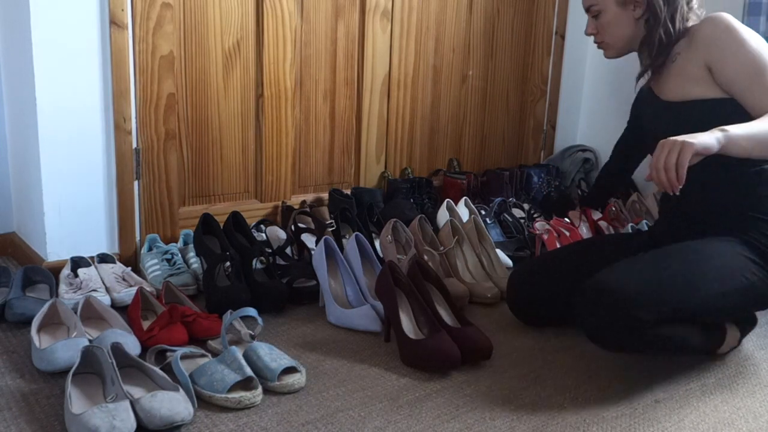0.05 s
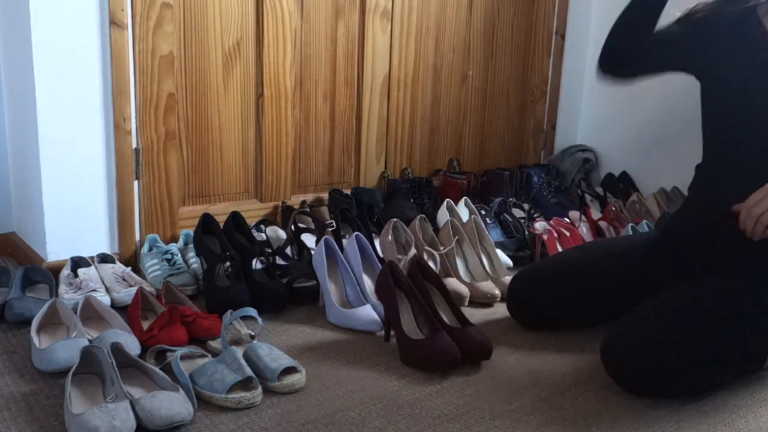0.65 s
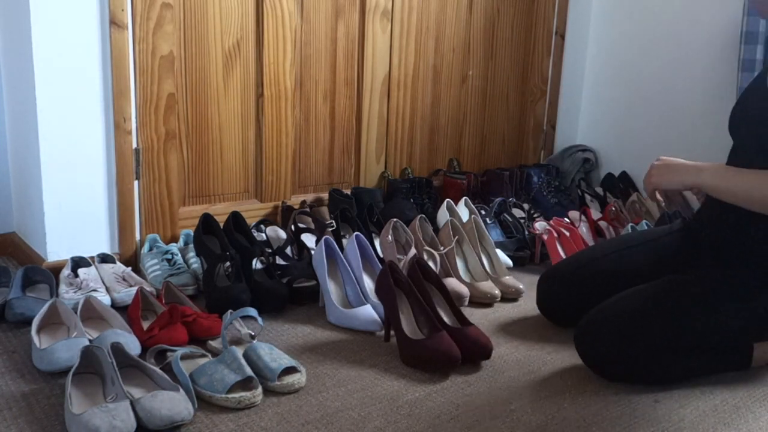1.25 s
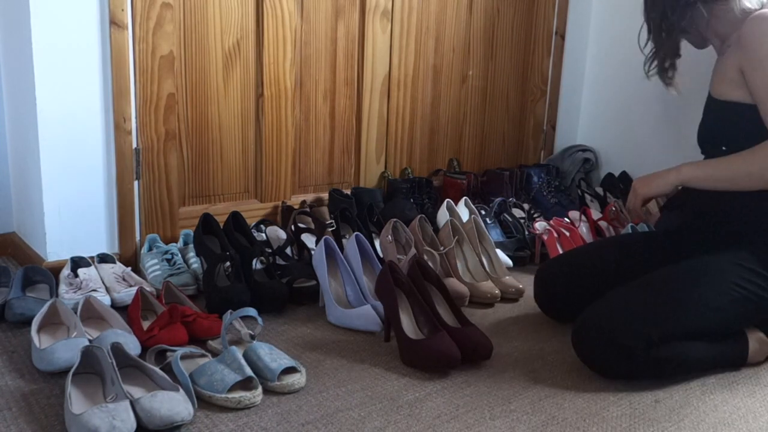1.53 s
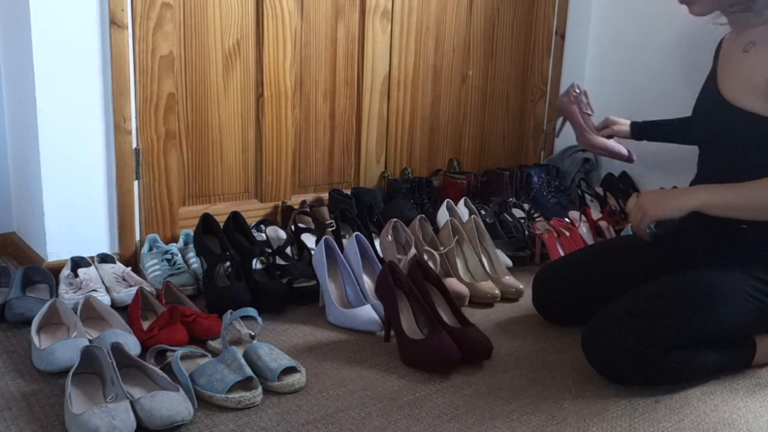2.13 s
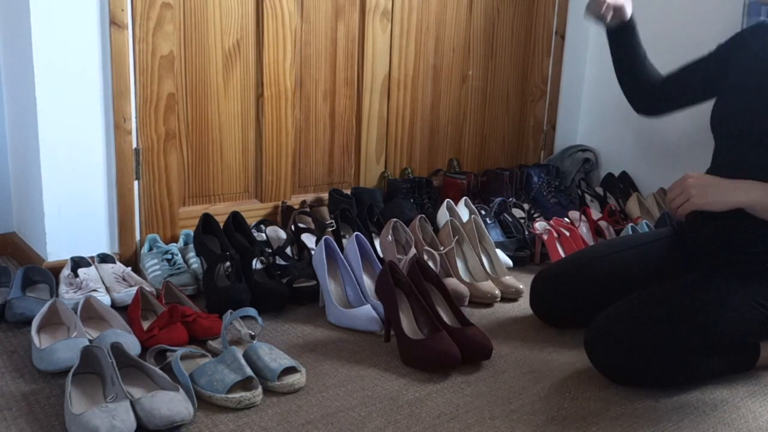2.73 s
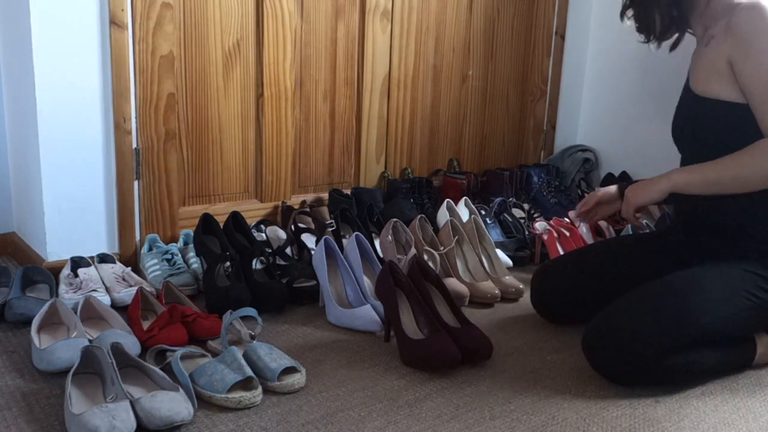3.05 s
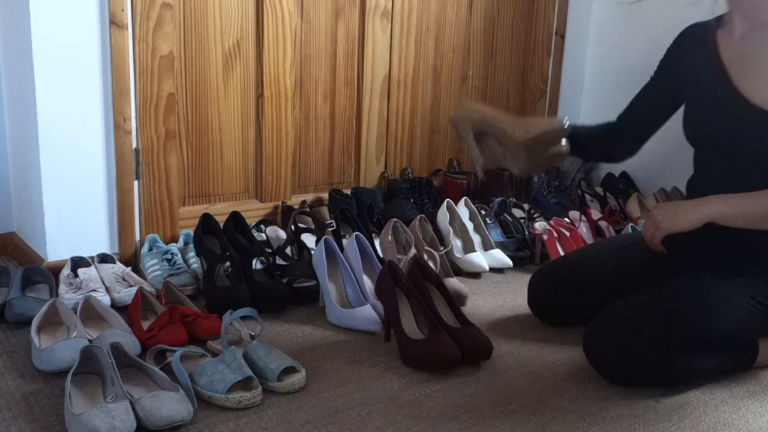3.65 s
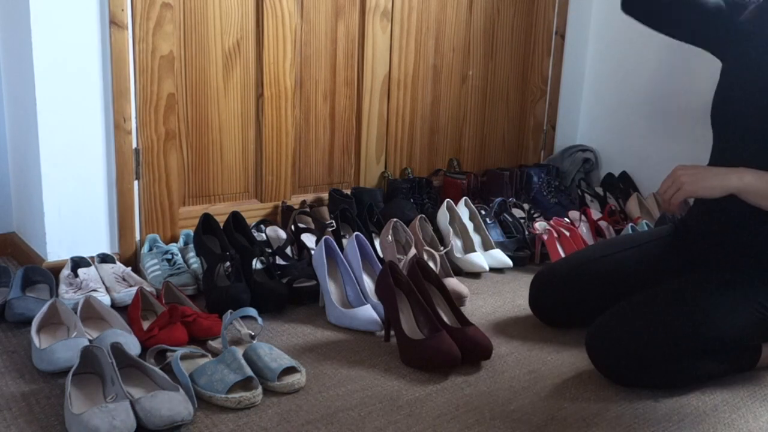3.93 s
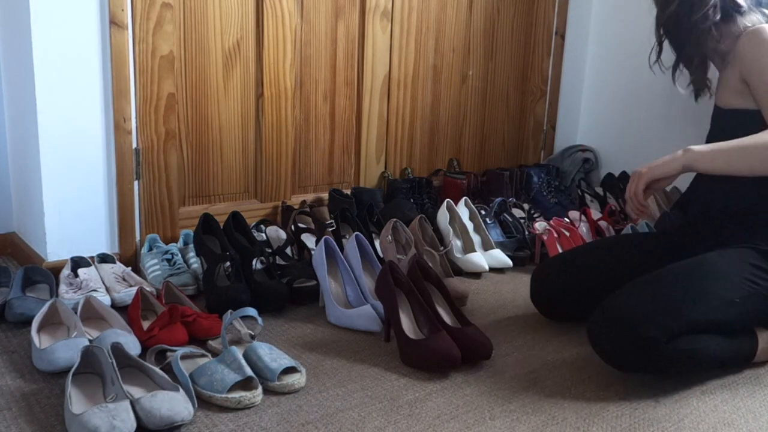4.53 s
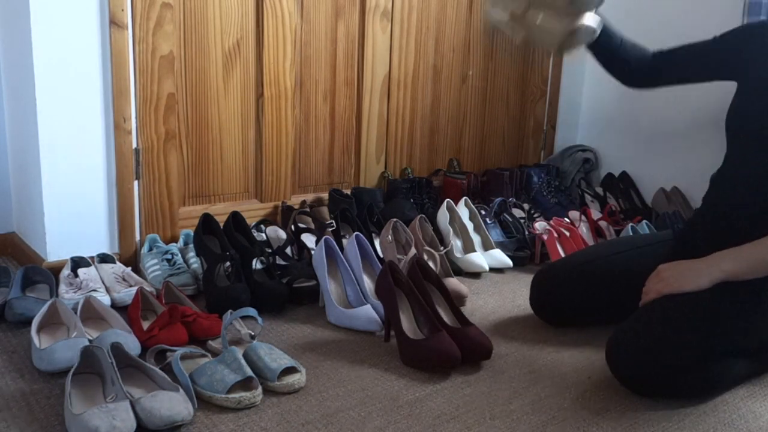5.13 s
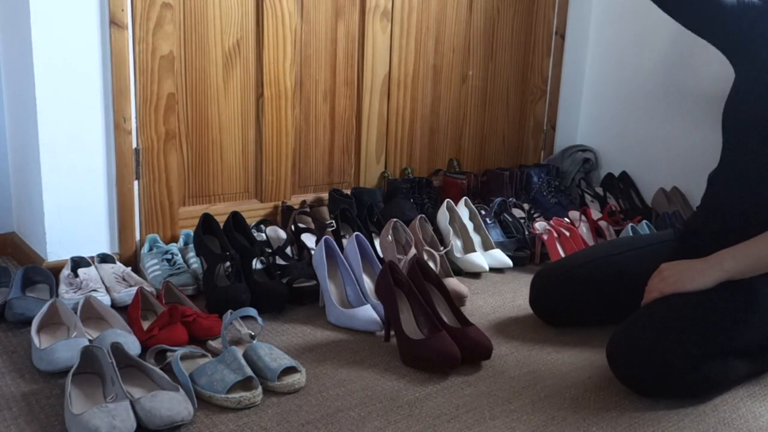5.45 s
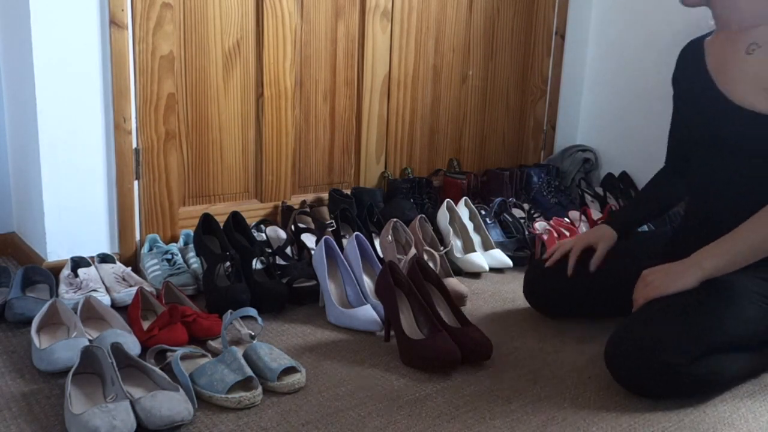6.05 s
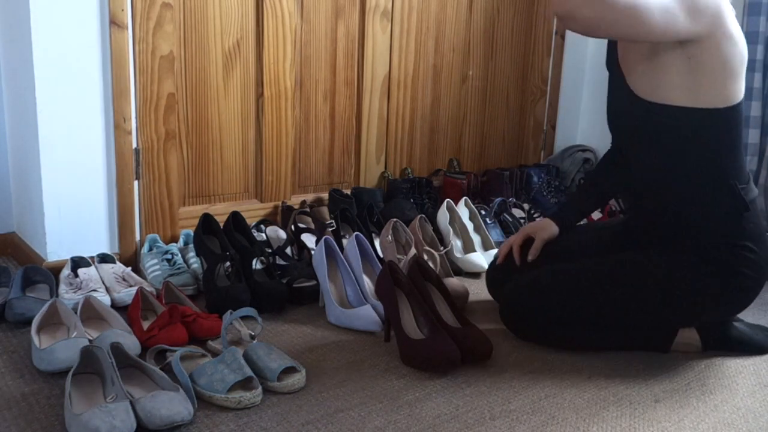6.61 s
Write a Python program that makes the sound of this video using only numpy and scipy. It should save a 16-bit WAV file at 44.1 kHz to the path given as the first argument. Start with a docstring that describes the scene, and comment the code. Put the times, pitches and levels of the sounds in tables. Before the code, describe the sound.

High-heeled shoes are picked up and tossed aside in a small room with little echo, over faint steady hum and hiss. At first, clothes rustle with a soft bump on carpet. Leather creaks briefly, and at about 0.9 seconds a pair lands in a hollow clatter of heels and soles, then skids and settles. Quiet fabric movement and leather rubbing lead to a second clatter at 2.7 seconds. More creaks of shoes gripped in the hand run from 3.2 to 3.9 seconds, followed by a brighter clatter at 4.1 with small bounces and a short slide. After a dull bump near 4.9 and further creaks, a fourth pair lands at 5.5 seconds, with one sharp click at 5.85. From 6 seconds to nearly 7, clothes brush and swish as the person shifts, with a muffled bump on the carpet around 6.4.

```python
"""High heels tossed on carpet

Someone kneeling in a small, dead room picks up pairs of shoes and tosses them aside.
Each pair lands in a clatter of heels and soles, then skids. Leather sticks and slips in the hand,
knees bump the floor, clothes brush the pile. Faint hum and hiss underneath."""
import sys
import numpy as np
from scipy import signal
from scipy.fft import rfft, irfft
from scipy.io import wavfile
from scipy.ndimage import uniform_filter1d, map_coordinates

SR = 44100
rng = np.random.default_rng(int(sys.argv[2]) if len(sys.argv) > 2 else 0)


def master_out(mix):
    """Clip the mix to full scale and print it as 16-bit PCM to the path in sys.argv[1]."""
    frames = np.transpose(np.atleast_2d(mix))
    ceiling = np.clip(frames, -1, 1)
    pcm = np.round(ceiling * 32767).astype(np.int16)
    wavfile.write(sys.argv[1], SR, pcm)


N = 298998
FFT_SIZE = 2 ** 15
HZ = np.maximum(np.fft.rfftfreq(FFT_SIZE, 1 / SR), 1)
AGE_S = np.arange(FFT_SIZE // 2) / SR
TIME_S = np.arange(N) / SR

# room decay: (frequency [Hz], T60 [s])
ROOM_DECAY = [(100, 0.32), (300, 0.13), (800, 0.15), (2000, 0.1), (5000, 0.1), (13000, 0.099)]
# stereo width; the microphone ports differ more for short waves: (frequency [Hz], side minus mid [dB])
DIFFUSE_WIDTH = [(30, -11.5), (70, -30), (130, -48), (300, -68), (600, -28.5), (1200, -13), (2500, -9.5),
                 (5000, -8), (9000, -4), (13000, -3)]
# room air and microphone hiss: (frequency [Hz], gain [dB])
AIR_SPECTRUM = [(15, -67), (25, -30), (145, -13.5), (175, -10.5), (200, -7.5), (249, -11.5), (344, -11),
                (394, -15), (451, -13), (1440, -23.5), (1790, -25.5), (2280, -23.5), (5140, -27),
                (13600, -27), (16000, -28.5)]
# width of the hiss, each port's own: (frequency [Hz], side minus mid [dB])
HISS_WIDTH = [(30, -14), (150, -17.5), (380, -7), (700, -1.5), (1300, 2), (16000, 0.5)]
# steady hum: (frequency [Hz], rms level [dB])
HUM_TONES = [(200.0, -70), (230.0, -86), (299.9, -83), (400.0, -86)]
# brushing on carpet: (frequency [Hz], gain [dB])
BRUSH_SPECTRUM = [(40, -25), (110, -8), (300, -3), (700, -1.5), (1300, -9), (3000, -15), (8000, -49)]
# fabric hiss: (frequency [Hz], gain [dB])
FABRIC_SPECTRUM = [(500, -32), (1300, -2.5), (2100, -3), (4000, 2.5), (8000, -0.5), (13000, -4.5),
                   (16000, -6)]
# clothes moving as the body shifts: (start [s], length [s], relative brush [dB], hiss [dB])
CLOTH_STROKES = [(-.04, 0.25, -64, -62.5), (0.16, 0.28, -58.5, -60.5), (1.166, 0.17, -60.5, -60.5),
                 (1.788, 0.095, -60, -66), (1.857, 0.18, -63, -67.5), (2.23, 0.31, -80, -71.5),
                 (3.227, 0.22, -71.5, -68.5), (3.392, 0.19, -70, -67.5), (4.63, 0.17, -61.5, -67),
                 (4.725, 0.13, -64.5, -68), (5.64, 0.23, -64.5, -62.5), (6.021, 0.26, -62.5, -61.5),
                 (6.212, 0.21, -62.5, -57), (6.324, 0.097, -54.5, -54), (6.372, 0.26, -65, -67),
                 (6.528, 0.33, -57, -58.5)]
# knees, hands and shoes on carpet: (time [s], level [dB], pitch [Hz], resonance [dB], slip time [s])
FLOOR_BUMPS = [(0.19, -6.5, 392, 9, .0013), (0.211, -7.5, 605, -4, 0.015), (1.109, -10.5, 170, 14, .005),
               (1.168, -15, 187, 13, .0024), (1.806, -26.5, 625, 19, 0.0028),
               (2.680, -0.5, 164, 15, 0.0043), (2.697, -4.5, 110, 13, 0.0032),
               (4.899, -6.5, 128, 8, 0.00091), (6.368, 1.5, 141, -3, 0.011), (6.387, -1, 470, 6, 0.024)]
# rubbed leather: (frequency [Hz], gain [dB])
LEATHER_SPECTRUM = [(100, -27), (600, -8.5), (1150, -5.5), (1650, -4), (2400, -5), (2900, -6), (3800, -3),
                    (4700, -9), (6000, -10), (10000, -16.5), (15000, -17)]
# resonances of a hand-held shoe's upper: (frequency [Hz], width [Hz], strength [dB])
UPPER_MODES = [(1133, 50, 6.5), (1390, 60, 2), (1710, 50, 6.5), (1870, 85, 1), (2100, 60, 4.5),
               (2320, 51, 4), (2550, 41, 0), (3350, 53, -14), (3870, 100, -2)]
# leather creaking in the hand: (time [s], relative level [dB], slip time [s], pitch [Hz], edge [dB])
LEATHER_RUBS = [ (0.7144, -19.5, 0.008, 4000, 6), (0.857, -33, 0.044, 4000, 16),
                (1.542, -21, 0.023, 2180, 5), (1.981, -26, 0.0085, 3000, 10),
                (2.377, -19.5, 0.034, 2010, 17), (2.451, -23, 0.0058, 2640, 14.5),
                (2.811, -18.5, 0.036, 1690, -9), (3.247, -23, .08, 2200, -1), (3.408, -21, 0.03, 1620, -8),
                (3.492, -16, .013, 1790, -11), (3.643, -19.5, 0.032, 1460, -25),
                (3.708, -14, 0.033, 1560, -0.5), (3.747, -8, 0.0072, 1130, -2.5),
                (3.764, -16.5, 0.01, 2440, 11.5), (3.877, -20, 0.0074, 1000, -18),
                (4.54, -28, .07, 2100, 15), (4.629, -21, 0.025, 2130, 11), (5.0523, -16.5, .006, 1910, 7),
                (5.076, -14, 0.0056, 2100, 5), (5.092, -14.5, 0.0096, 1980, 3),
                (5.166, -14.5, 0.012, 1810, 2), (5.2044, -7.5, 0.0076, 2300, 2.5),
                (5.322, -30.5, 0.0035, 7700, 11.5), (5.729, -24.5, .07, 3450, 5)]
# sole contact: (frequency [Hz], gain [dB])
SOLE_SPECTRUM = [(30, -26), (52, -24), (85, -16.5), (108, -12.5), (240, -2.5), (400, -2.5), (800, -1.5),
                 (1500, -5.5), (2600, -4.5), (4000, -8.5), (6000, -14.5), (10000, -18.5), (13500, -18.5),
                 (16000, -28.5)]
# resonances of struck shoes, floor and corner: (frequency [Hz], width [Hz], strength [dB])
IMPACT_MODES = [(36, 5.4, 11), (109.6, 13, 8.5), (170, 45, 6), (284.5, 25, 4.5), (363.4, 19, 7),
                (397, 15, 3.5), (472, 16.5, 4.5), (668, 18, 7.5), (870, 20, 6.5), (1016, 17, 2.5),
                (1307, 26, 7), (1502, 23.3, -3.5), (1897, 37, 5), (2220, 20.3, 1.5), (2480, 10, 4),
                (2680, 32, -3.5), (4952, 12, -8)]
# landed pairs sliding to rest: (time [s], level [dB], slip time [s])
SOLE_SKIDS = [(1.025, -9.5, 0.13), (2.77, -24.5, .05), (4.147, -11.5, .02), (4.184, -8.5, 0.026)]
# heel and sole strikes:
# (time [s], level [dB], weight [dB], crack [dB], hollow [Hz], hollow [dB], slip time [s])
HEEL_KNOCKS = [ (0.9372, 5.5, -16, 6.5, 2870, 6, 0.0034), (0.9398, 4.5, -24, 1, 870, 10, 0.012),
               (0.9530, 10.5, -6, -7, 820, 8.5, 0.0026), (0.96, 7, -7, 2.5, 640, 7.5, 0.0032),
               (0.9784, 10, -11, -19, 900, 8.5, .0002), (0.9834, 5.5, -10, 3.5, 1360, 8, 0.0024),
               (1.05, -9, 8.5, -26, 1860, 8.5, 0.0035), (1.106, -10.5, 6, 2, 3780, 5.5, 0.008),
               (1.169, -17.5, 5, 0, 1930, 7, .003), (1.231, -27.5, 3, 24, 3000, -1, .002),
               (2.6546, 1.5, -1.5, 3.5, 920, 12.5, 0.0053), (2.679, 4.5, -11.5, -7.5, 388, 11, 0.0044),
               (2.6832, 5, -23, -4.5, 2660, 11.5, 0.0016), (2.699, 0, -2.5, -8, 1710, 13, 0.0035),
               (2.7328, 3, -1, -7.5, 1930, 6, 0.0025), (2.7372, -7, -2, -6, 800, 11.5, 0.0013),
               (4.066, -4.5, -34, 3, 2290, 16, 0.0034), (4.07, 5.5, -21, 11, 1920, 7.5, 0.0037),
               (4.0761, 7, 3.5, 11, 490, 7.5, 0.0074), (4.087, 5, -2, 10.5, 1200, 9, 0.0036),
               (4.102, -2, -2, 14, 367, 1, .008), (4.122, -5, -13, 12.5, 486, 6, .006),
               (4.218, -7.5, 4.5, 10, 1880, 3, 0.0063), (4.234, -14, 5, -3, 700, -6, 0.0048),
               (4.298, -28.5, 6, 10, 1500, 5, .005), (5.476, 4, -2, -2, 1890, 6.5, 0.0044),
               (5.4856, 2.5, 4, .5, 650, 10, 0.0059), (5.4917, 4, -13, -11, 377, 12, 0.0023),
               (5.506, -3.5, 3, 7, 2100, 3.5, 0.016), (5.553, -10, -10, 4, 1500, 9, 0.013),
               (5.599, -8, -1, -3, 2200, 7, 0.0042), (5.8466, -3.5, 3.5, 20.5, 4180, 9.5, 0.00097),
               (5.85, -1.5, 1, 4, 530, 11.5, 0.0032), (5.852, -1, -19, 20, 4530, 9.5, 0.00037)]


def from_db(db):
    """Decibels to gain."""
    return 10 ** (np.asarray(db) / 20)


def at_hz(points, hz):
    """Interpolate a table along log frequency."""
    knots_hz, values = np.transpose(points)
    return np.interp(np.log(hz), np.log(knots_hz), values)


def unit_energy(x):
    """Scale to a sum of squares of one."""
    return x / np.sqrt(np.sum(x ** 2) + 1e-20)


def add(out, time_s, sound):
    """Mix in a stereo sound."""
    start = max(int(time_s * SR), 0)
    out[:, start:start + sound.shape[1]] += sound[:, :N - start]


def drift(rate_hz):
    """Smooth random curve, spread about one."""
    return map_coordinates(rng.standard_normal(4096), [TIME_S * rate_hz], order=3, mode="wrap")


def coloured(x, gain_db):
    """Minimum-phase filter; gain given on HZ."""
    cepstrum = irfft(np.log(from_db(gain_db)))
    cepstrum[1:FFT_SIZE // 2] *= 2
    cepstrum[FFT_SIZE // 2 + 1:] = 0
    return irfft(rfft(x, FFT_SIZE) * np.exp(rfft(cepstrum)))


def above(hz):
    """Shelf rising from zero to one around hz."""
    return 1 / (1 + (hz / HZ) ** 3)


def resonance_db(hz, peak_db, sharpness=1.19):
    """One resonance, narrower when taller; flat for peaks at or below 0 dB."""
    height = from_db(max(peak_db, 0))
    offset = sharpness * height * (HZ / hz - hz / HZ)
    return 10 * np.log10(1 + (height ** 2 - 1) / (1 + offset ** 2))


def ringing_db(modes, vary_db=1.5, detune=0):
    """Narrow resonances; strength, and optionally pitch, vary per contact."""
    power = 0
    for (hz, width_hz, db), (strength, shift) in zip(modes, rng.standard_normal((len(modes), 2))):
        offset = 2 * (HZ - hz * (1 + detune * shift)) / width_hz
        power += from_db(2 * (db + vary_db * strength)) / (1 + offset ** 2)
    return 10 * np.log10(1 + power)


def stereo_noise(spectrum, size, width=DIFFUSE_WIDTH):
    """Diffuse noise at the two ports; mid rms of one."""
    hz = np.maximum(np.fft.rfftfreq(size, 1 / SR), 1)
    mid, side = np.exp(2j * np.pi * rng.random((2, len(hz)))) * from_db(at_hz(spectrum, hz))
    mid = irfft(mid, size)
    side = irfft(side * from_db(at_hz(width, hz)), size)
    return (mid + side * [[1], [-1]]) / np.std(mid)


def room(direct_db, late_db=-32, late_t60_s=0.36, shell_s=0.0019, build_s=0.0013):
    """Impulse response: shell buzz and one push of the sole, then reflections dying band by band."""
    hz = np.maximum(np.fft.rfftfreq(len(AGE_S), 1 / SR), 1)
    field = rfft(stereo_noise([(1, 0), (SR, 0)], len(AGE_S)))
    late = from_db(late_db - 60 * AGE_S / late_t60_s)
    tail = 0
    for band_hz, t60_s in ROOM_DECAY:
        share = at_hz([(f, f == band_hz) for f, _ in ROOM_DECAY], hz)
        tail += irfft(field * share) * (from_db(-60 * AGE_S / t60_s) + late)
    tail = np.sqrt(2) * unit_energy(tail * (1 - np.exp(-AGE_S / build_s)))
    buzz = unit_energy(rng.standard_normal(len(AGE_S)) * np.exp(-AGE_S / shell_s))
    push = unit_energy(np.exp(-AGE_S / 0.00014))
    direct = unit_energy(buzz + 0.62 * push)
    return (tail + from_db(direct_db) * direct) / np.sqrt(1 + from_db(2 * direct_db))


def contact(slip_s, direct_db, snap, slips_per_s, grain_db=3, swell=0):
    """A snap, then tiny slips that fade; heard through the room, broadly whitened. Swell delays the peak."""
    slips = (rng.random(len(AGE_S)) < slips_per_s / SR) * from_db(grain_db * rng.standard_normal(len(AGE_S)))
    slips *= rng.choice([-1, 1], len(AGE_S))
    pressure = np.exp(-0.5 * ((1 + swell) * AGE_S / slip_s - 2 * swell) ** 2)
    force = unit_energy(slips * pressure)
    force[0] += snap
    heard = signal.fftconvolve(room(direct_db), force[None], axes=1)
    power = uniform_filter1d(np.abs(rfft(heard.mean(axis=0), FFT_SIZE)) ** 2, size=81)
    return coloured(heard, -10 * np.log10(power + 1e-4))


def background(air_db=-67):
    """Steady hum, room air and microphone hiss."""
    hum = 0
    for hz, db in HUM_TONES:
        hum += np.sqrt(2) * from_db(db) * np.sin(2 * np.pi * (hz * TIME_S + rng.random()))
    return hum + from_db(air_db) * stereo_noise(AIR_SPECTRUM, N, HISS_WIDTH)


def clothes(brush_trim_db=-1, grain_db=0.35, rise_share=0.25, speed_power=1.15):
    """Fabric drags over the pile, speeding up and slowing: dull brush, grainy hiss."""
    brush, hiss = np.zeros((2, N))
    for start_s, length_s, brush_db, hiss_db in CLOTH_STROKES:
        speed = np.interp((TIME_S - start_s) / length_s, [0, rise_share, 1], [0, 1, 0])
        stroke = speed ** speed_power
        brush += stroke * from_db(brush_db + brush_trim_db)
        hiss += stroke * from_db(hiss_db)
    brushing = brush * stereo_noise(BRUSH_SPECTRUM, N)
    grain = from_db(grain_db * drift(rate_hz=230))
    return brushing + hiss * grain * stereo_noise(FABRIC_SPECTRUM, N)


def bumps(width_octaves=1.63, depth_db=40):
    """Padded contacts move only a broad band of low tones."""
    out = np.zeros((2, N))
    for time_s, db, hz, peak_db, slip_s in FLOOR_BUMPS:
        push = contact(slip_s, direct_db=-3, snap=0.98, slips_per_s=980)
        bell = np.exp(-0.5 * (np.log2(HZ / hz) / width_octaves) ** 2)
        add(out, time_s, coloured(push, db + depth_db * (bell - 1) + resonance_db(hz, peak_db)))
    return out


def rubs(edge_hz=4200, trim_db=-3, grip_db=9):
    """Leather sticks and slips in swelling runs that ring the upper; the grip picks out one resonance."""
    out = np.zeros((2, N))
    for time_s, db, slip_s, hz, edge_db in LEATHER_RUBS:
        slips = contact(slip_s, direct_db=-3, snap=0.085, slips_per_s=2200, grain_db=4, swell=0.52)
        shoe_db = at_hz(LEATHER_SPECTRUM, HZ) + resonance_db(hz, grip_db) + edge_db * above(edge_hz)
        modes_db = ringing_db(UPPER_MODES, vary_db=2.5, detune=0.023)
        add(out, time_s, coloured(slips, db + trim_db + shoe_db + modes_db))
    return out


def skids(edge_db=12, edge_hz=4000, hollow_hz=690, hollow_db=4):
    """Soles slide in a dying run of slips that ring the impact modes."""
    out = np.zeros((2, N))
    shoe_db = at_hz(SOLE_SPECTRUM, HZ) + edge_db * above(edge_hz) + resonance_db(hollow_hz, hollow_db)
    for time_s, db, slip_s in SOLE_SKIDS:
        slips = contact(slip_s, direct_db=-6, snap=0.3, slips_per_s=1800)
        add(out, time_s, coloured(slips, db + shoe_db + ringing_db(IMPACT_MODES)))
    return out


def knocks(weight_hz=420, crack_hz=4000, usual_slip_s=0.0045):
    """Each strike clacks with the hollow of its shoe, fills the room and rings the modes."""
    out = np.zeros((2, N))
    for time_s, db, weight_db, crack_db, hollow_hz, hollow_db, slip_s in HEEL_KNOCKS:
        shelves_db = weight_db * (1 - above(weight_hz)) + crack_db * above(crack_hz)
        shoe_db = at_hz(SOLE_SPECTRUM, HZ) + shelves_db + resonance_db(hollow_hz, hollow_db)
        direct_db = -5 + 2.5 * np.log2(usual_slip_s / slip_s)  # shorter contact, more direct sound
        blow = contact(slip_s, direct_db, snap=0.54, slips_per_s=1800)
        add(out, time_s, coloured(blow, db + shoe_db + ringing_db(IMPACT_MODES)))
    return out


def from_right(x, lag_s=1.4e-5):
    """Sound reaches the left port later."""
    left = map_coordinates(x[0], [(TIME_S - lag_s) * SR], order=5)
    return np.array([left, x[1]])


def scene():
    """Landings slightly right; handling and movement ahead."""
    return from_right(knocks() + skids()) + rubs() + bumps() + clothes() + background()


def record(dry):
    """Steep low-pass."""
    cutoff_hz = 16100
    return signal.sosfilt(signal.ellip(10, 0.1, 80, cutoff_hz, fs=SR, output="sos"), dry)


dry = scene()
out = record(dry)
master_out(out)
```